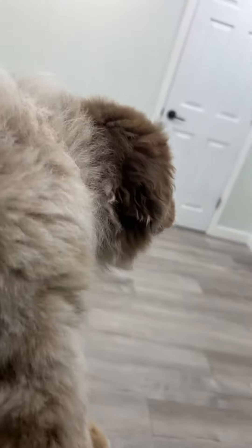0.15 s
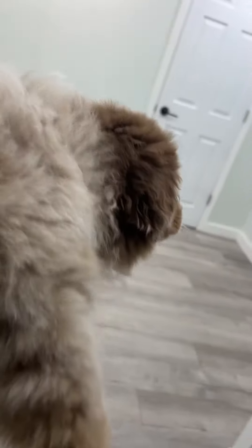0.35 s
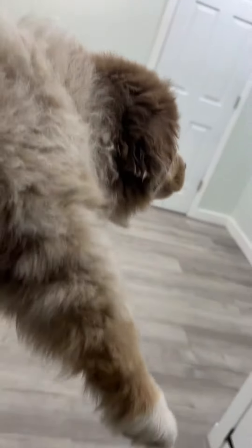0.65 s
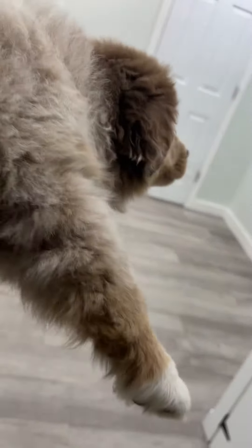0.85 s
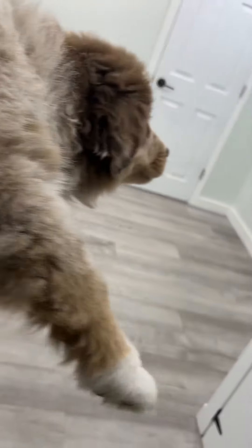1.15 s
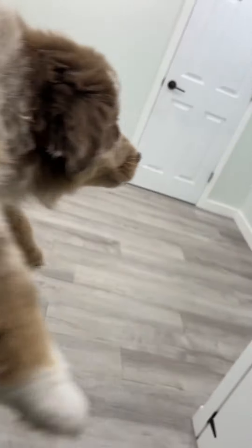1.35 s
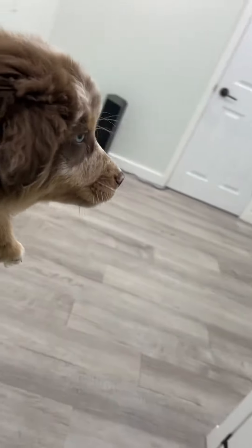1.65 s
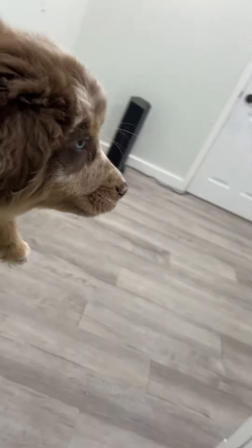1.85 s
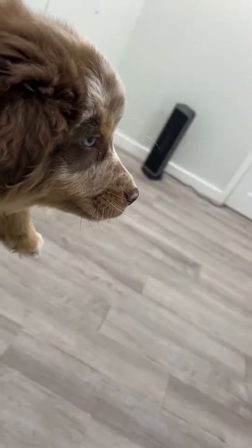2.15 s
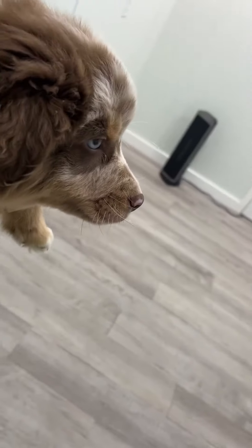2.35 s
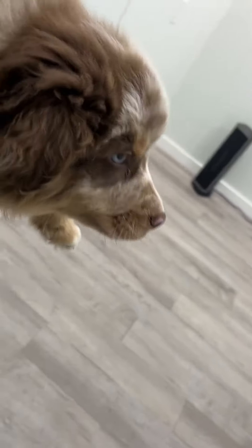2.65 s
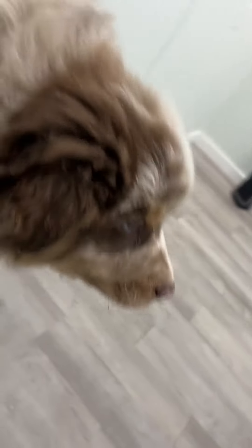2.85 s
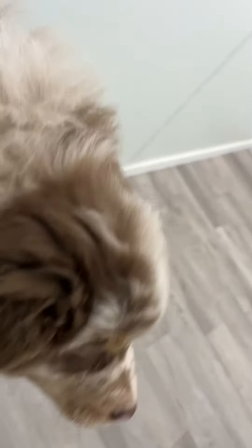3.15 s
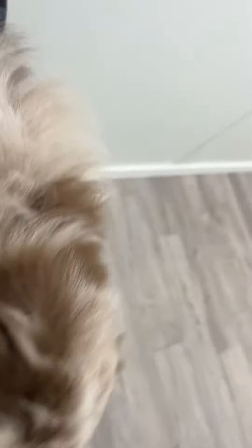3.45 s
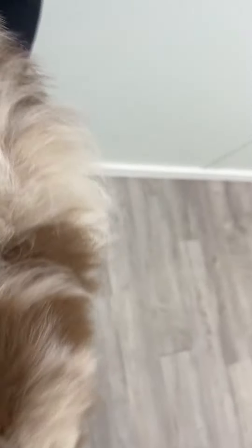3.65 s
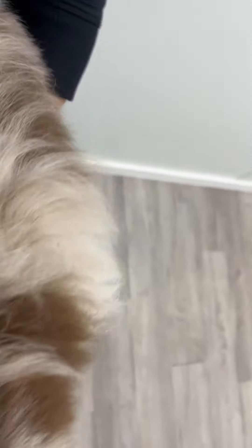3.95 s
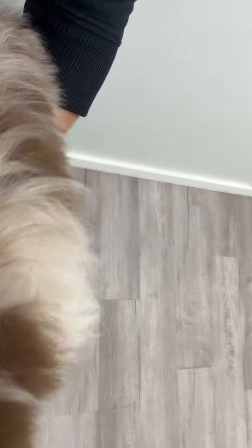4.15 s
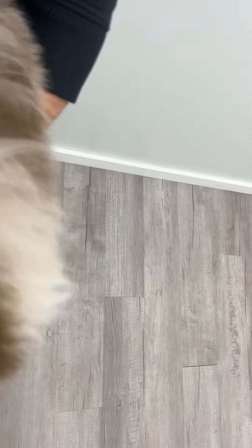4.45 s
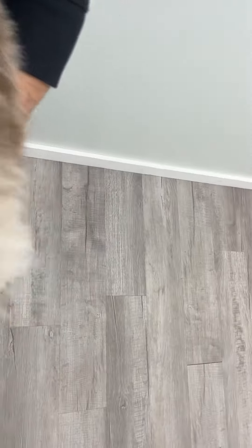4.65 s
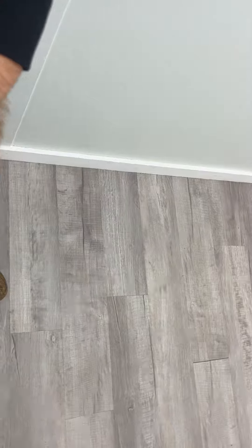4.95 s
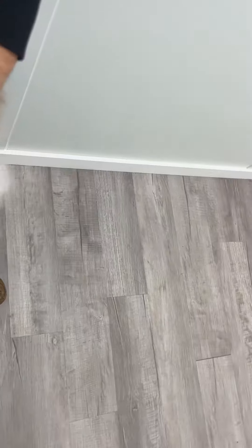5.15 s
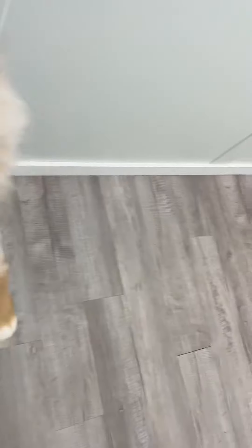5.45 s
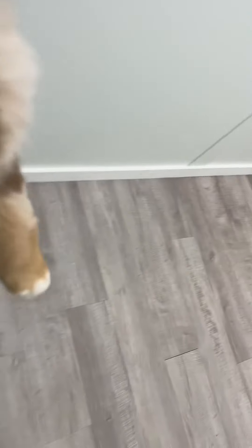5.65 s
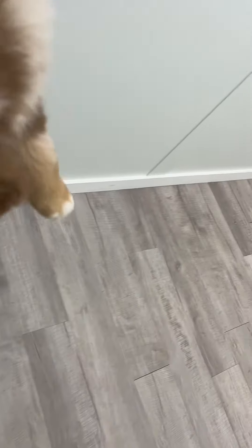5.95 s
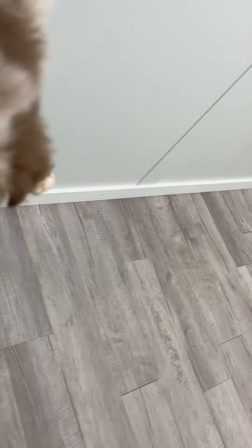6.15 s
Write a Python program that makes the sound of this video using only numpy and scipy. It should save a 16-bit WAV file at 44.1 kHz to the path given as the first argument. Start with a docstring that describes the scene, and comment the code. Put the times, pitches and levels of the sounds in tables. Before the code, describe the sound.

In a bare, reflective room, a low steady hum near 100 Hz lies under still air and faint fur rustle. A very thin, high nasal whistle falls at 0-0.4 s, with a soft booming bump at 0.4. After a tiny peep at 0.7, a puppy close to the microphones, slightly left, gives a short high cry at 1.0 dropping steeply. Another bump comes at 1.25, then whimpers at 1.3 and 1.8, with quick sniffs and a faint click. From 2.3 to 3.8 s a long cry slides from squeal to low, wavering, sometimes rough moan, with a slight bump at 3.2. A quieter gap follows. A rougher, rising-and-falling whine fills 4.3-5.1, a clear strong cry 5.3-5.7. Handling thuds and rustle return from 5.7; a sharp tick at 6.15 lands within a last cry starting at 6.05, and a bump ends it at 6.3.

```python
"""A bare room with a hard floor: a puppy, held up near a phone, whimpers into two close microphones.
Each cry, a near-pure tone with weak overtones and breath, slides from a squeal to a moan that wavers.
Thin nasal whistles, air-jet tones in their own hiss, sound around the cries; echoes smear the slides.
Sine tones make the hum under it; shaped noise makes the still air, the rustle of fur, soft handling
bumps with deep booms, the puppy's sniffs, a faint click and, near the end, a sharp tick."""
import sys
import numpy as np
from scipy import signal
from scipy.fft import rfft, irfft, next_fast_len
from scipy.io import wavfile
from scipy.ndimage import uniform_filter1d

SR = 44100
rng = np.random.default_rng(int(sys.argv[2]) if len(sys.argv) > 2 else 0)


def generate_wav(signal):
    """Clip the signal to [-1, 1] and save it as 16-bit WAV at the path in sys.argv[1]."""
    frames = np.transpose(np.atleast_2d(signal))
    scaled = np.clip(frames, -1, 1) * 32767
    pcm = np.round(scaled).astype(np.int16)
    wavfile.write(sys.argv[1], SR, pcm)


N = 278271
TIME = np.arange(N) / SR  # s
EDGE_HZ = 15900  # top of the phone's band


def gain_of(db):
    """Decibels to amplitude."""
    return 10 ** (np.asarray(db) / 20)


def evened(x):
    """Scales to rms 1."""
    return x / np.sqrt(np.mean(x ** 2) + 1e-20)


def read(points, hz):
    """A spectrum table, joined on a log-frequency axis."""
    f, value = np.transpose(points)
    return np.interp(np.log(hz + 1), np.log(f + 1), value)


def follow(rows):
    """The columns of a curve table at every sample."""
    s, *columns = np.transpose(rows)
    return [np.interp(TIME, s, column) for column in columns]


def eased(x, half, steepness):
    """Moves smoothly from 0 to 1, half-way at the given age or frequency."""
    return 1 - 1 / (1 + (np.maximum(x, 0) / half) ** steepness)


def gate(age, length, rise, fall):
    """Opens softly at age zero and has closed to half amplitude at the given length."""
    opening = np.clip(age / rise, 0, 1) * np.clip((length + fall / 2 - age) / fall, 0, 1)
    return np.sin(np.pi / 2 * opening) ** 2


def swell(s, db, rise, t60):
    """The level of a soft blow: a straight rise, then an even decay."""
    age = np.maximum(TIME - s, 0)
    decay = np.exp(-np.log(1000) * np.maximum(age - rise, 0) / t60)
    return np.minimum(age / rise, 1) * gain_of(db) * decay


def waver(rate_hz):
    """Slow chance of rms 1, fading out above the given rate."""
    count = 8192
    hz = np.fft.rfftfreq(count, N / SR / count)
    slow = irfft(rfft(rng.standard_normal(count)) / (1 + (hz / rate_hz) ** 4))
    return np.interp(TIME, np.linspace(0, N / SR, count), evened(slow))


def shaped(x, gain):
    """Filters by a gain that is a function of frequency."""
    size = next_fast_len(N + 4096)
    return irfft(rfft(x, size) * gain(np.fft.rfftfreq(size, 1 / SR)), size)[..., :N]


def coloured(points):
    """One-channel noise of rms 1 with the colour of a spectrum table."""
    return evened(shaped(rng.standard_normal(N), lambda f: gain_of(read(points, f))))


# Chosen left-right likeness of the scattered sound by band; near 8 kHz it is mono.
# Each row: frequency in Hz, likeness before the bass is drawn together (1 = the same).
LIKENESS = [(400, 0.43), (650, 0.089), (1300, 0.18), (2500, 0.19), (4500, 0.38), (8000, 1), (14000, 0.61)]


def diffuse(a, b, hz):
    """Scattered sound at two microphones: their spacing matters little in the bass, so it is alike there."""
    above_bass = hz ** 2 / (hz ** 2 + 480 ** 2)
    same = 1 - (1 - np.clip(read(LIKENESS, hz), -1, 1)) * above_bass
    mid, side = a * np.sqrt((1 + same) / 2), b * np.sqrt((1 - same) / 2)
    return np.array([mid + side, mid - side])


def noise(gain):
    """Diffuse stereo noise of rms 1 and a given colour."""
    size = next_fast_len(N)
    hz = np.fft.rfftfreq(size, 1 / SR)
    scattered = diffuse(*rfft(rng.standard_normal((2, size))), hz)
    return evened(irfft(scattered * gain(hz), size)[:, :N])


def ports(x, lag):
    """A near sound reaches the left microphone first, the right one a moment (s) later."""
    return np.array([x, shaped(x, lambda f: np.exp(-2j * np.pi * f * lag))])


# Hum of an appliance, lowest tone first. Each row: frequency in Hz, level in dB before HUM_LEVEL.
HUM = [(98.8, -57), (199.3, -77), (298.5, -86.5)]
# The hum changes as the phone moves through the room's standing waves.
# Each row: time in seconds, change of the lowest tone in dB, change of the overtones in dB.
HUM_LEVEL = [(0, -2, 4), (2.4, -0.5, 9), (3.8, -2, 2.5), (4.5, -5, -6.5), (5.8, -5.5, 9.5), (6.3, -23, 14)]
# Colour of the room's still air. Each row: frequency in Hz, relative density in dB per Hz.
AIR = [(15, -62), (32, -45), (55, -5.5), (85, 1), (130, -15), (250, -13), (500, -39.5), (1000, -40.5),
       (2000, -37), (4200, -44), (6500, -62.5), (9000, -65.5), (12000, -79), (15000, -80)]


def background(air_db=-64, wander_s=.00008):
    """Steady hum tones, slightly wandering in time, and the diffuse noise of still air."""
    drift = TIME + wander_s * waver(0.9)
    base, *overtones = [np.sqrt(2) * gain_of(db) * np.sin(2 * np.pi * (hz * drift + rng.random()))
                        for hz, db in HUM]
    base_db, overtones_db = follow(HUM_LEVEL)
    hum = gain_of(base_db) * base + gain_of(overtones_db) * sum(overtones)
    return hum + gain_of(air_db) * noise(lambda f: gain_of(read(AIR, f)))


# Fur and sleeve rubbing near the microphones. Each row: time in seconds, relative level in dB.
RUSTLE = [(0, -64.5), (.2, -71), (.6, -61), (1.2, -62.5), (1.65, -62.5), (1.95, -66), (2.2, -62),
          (2.32, -67), (2.5, -68.5), (2.85, -66), (3.05, -64.5), (3.6, -65), (3.88, -78.5), (4.0, -70.5),
          (4.15, -74), (4.25, -78), (5.15, -73.5), (5.65, -62), (6.31, -61.5)]
# Colour of the rubbing. Each row: frequency in Hz, relative density in dB per Hz.
RUSTLE_COLOUR = [(300, 7), (1000, -2), (2000, -7), (3400, -4.5), (4500, 4), (6300, -18), (8500, -14.5),
                 (10500, -16.5), (12300, -30.5), (14500, -22), (16000, -38.5)]


def rustle(level_db=1, uneven_db=1.5, lag=0.00013, scattered_db=-7):
    """Fur rubs close to the microphones, so most of it arrives by the straight path."""
    close = ports(coloured(RUSTLE_COLOUR), lag)
    scattered = gain_of(scattered_db) * noise(lambda f: gain_of(read(RUSTLE_COLOUR, f)))
    level = follow(RUSTLE)[0] + level_db + uneven_db * waver(17.8)
    return gain_of(level) * (close + scattered)


# Thin nasal whistles, each easing towards its last pitch. Each row: start in seconds, length in seconds,
# attack in seconds, first pitch in Hz, last pitch in Hz, time to half-way in seconds,
# relative level in dB, grip of the voice on it from 0 to 1.
WHISTLES = [ (0.0, 0.38, 0.0014, 8160, 7080, 0.075, -53, 0.1),
            (0.923, 0.19, 0.075, 7850, 7300, 0.066, -70, 0.1),
            (1.308, 0.14, 0.099, 8100, 7500, 0.1, -54.5, 0.5),
            (1.814, 0.12, 0.039, 7970, 7710, 0.11, -60.5, 0.7),
            (2.289, 0.19, 0.044, 7530, 8340, 0.086, -63, 1),
            (4.342, 0.2, 0.0085, 7760, 8060, 0.1, -55.5, 0.46),
            (5.258, 0.16, 0.0047, 7560, 8270, 0.065, -59, 1),
            (5.902, 0.25, 0.029, 7980, 7340, 0.077, -54.5, 1), ]
# A whistle's octave is strong below 14 kHz and fades steeply as its pitch rises.
# Each row: frequency of the octave in Hz, level in dB against the whistle.
WHISTLE_OCTAVE = [(13900, 17), (14330, -2), (14600, -10), (14900, -10), (15300, -19.5), (16200, -49)]


def whistles(swing, jitter=0.0034, voiced_jitter=0.0084, drift=0.0029, flutter_db=3.0, depth=0.88, bend=0.8,
             air_db=-21, air_hz=8900, air_width_hz=1400, low_hz=6600):
    """A thin air-jet tone in its own hiss; the swinging folds unsettle it and give it side bands."""
    out = np.zeros(N)
    voiced = uniform_filter1d(abs(swing), size=400)
    wobble = 1 + (jitter + voiced_jitter * voiced) * waver(100) + drift * waver(24)
    air_band = lambda f: np.exp(-((f - air_hz) / air_width_hz) ** 2)
    air = gain_of(air_db) * evened(shaped(rng.standard_normal(N), air_band))
    for start, length, attack, first_hz, last_hz, half, db, grip in WHISTLES:
        opening = gate(TIME - start, length, attack, fall=0.051)
        on = opening > 0
        hz = first_hz + (last_hz - first_hz) * eased(TIME[on] - start, half, steepness=2)
        phase = 2 * np.pi * np.cumsum(hz * wobble[on]) / SR + bend * grip * swing[on]
        octave = gain_of(read(WHISTLE_OCTAVE, 2 * hz)) * np.sin(2 * phase)
        jet = np.sin(phase) + air[on] + octave
        out[on] += gain_of(db) * opening[on] * jet * (1 + depth * grip * swing[on])
    return shaped(out * gain_of(flutter_db * waver(60)), lambda f: eased(f, low_hz, steepness=53))


# Soft bumps of handling and paws. Each row: start in seconds, level in dB before the scuffing,
# rise in seconds, t60 in seconds, low edge in Hz, top edge in Hz.
BUMPS = [(0.387, -44.5, 0.065, 0.74, 113, 250), (0.79, -54.5, 0.03, 0.39, 120, 292),
         (1.248, -42.5, 0.019, 0.94, 119, 175), (3.16, -51, 0.0037, 0.13, 180, 353),
         (5.681, -58.5, 0.048, 0.95, 80, 130), (5.939, -46.5, 0.012, 0.3, 197, 460),
         (6.284, -37.5, 0.022, 1, 418, 484)]
# Deep booms close to some of the bumps. Each row: start in seconds, level in dB, t60 in seconds.
BOOMS = [(0.391, -49, 1.3), (1.24, -47, 3), (5.72, -61, 0.59)]


def bumps(boom_hz=52, boom_octaves=0.31, boom_rise=0.14, rumble_db=-73,
          ring_hz=172, ring_width_hz=22, ring_db=8, grain_db=-1.0):
    """Dull, scuffing thuds that stir one low resonance, with deep booms over a constant faint rumble."""
    boom = gain_of(rumble_db) + sum(swell(s, db, boom_rise, t60) for s, db, t60 in BOOMS)
    out = boom * noise(lambda f: np.exp(-(np.log2((f + 1) / boom_hz) / boom_octaves) ** 2 / 2))
    scuff = gain_of(grain_db * waver(24))
    for s, db, rise, t60, low_hz, top_hz in BUMPS:
        def thud_gain(f):
            ring = gain_of(ring_db / (1 + ((f - ring_hz) / ring_width_hz) ** 2))
            return ring * f ** 2 / (low_hz ** 2 + f ** 2) / (1 + (f / top_hz) ** 3.17)
        out += noise(thud_gain) * scuff * swell(s, db, rise, t60)
    return out


# Colour of the overtones through the nose, and with the mouth open; also of the breath.
# Each row: frequency in Hz, relative level in dB.
THROAT = [(900, 27), (1450, 8.5), (1750, 14), (2250, 10), (3000, 10), (3800, 4.5), (4600, 5), (5400, -3),
          (6400, -15.5), (8500, -13), (10000, -23), (12000, -46)]
USUAL_HZ = 650  # pitch at which the mouth's resonances stand where listed


def throat_db(f, pitch_hz, mouth, lower_hz, lower_db, upper_hz, upper_db,
              rise=0.2, width_hz=190, brighten_db=8.5):
    """Overtones tilt up (dB per octave) and two mouth resonances rise (octaves) per octave of pitch."""
    strain = np.log2(pitch_hz / USUAL_HZ)  # octaves
    peak = lambda hz: 1 / (1 + ((f - hz * 2 ** (rise * strain)) / width_hz) ** 2)
    tilt = brighten_db * strain * np.log2(f / lower_hz)
    return read(THROAT, f) + tilt + mouth * (lower_db * peak(lower_hz) + upper_db * peak(upper_hz))


def hiss(swing, low_hz=900):
    """Air escapes in a puff each time the folds part."""
    puffs = rng.standard_normal(N) * (1 + swing)
    return evened(shaped(puffs, lambda f: gain_of(read(THROAT, f)) * f ** 2 / (f ** 2 + low_hz ** 2)))


def nose(x, ring_hz=1458, ring_width_hz=55, ring_db=5, dip_hz=1850, dip_width_hz=190, dip_db=-4.0, low_hz=335):
    """The nasal passage rings in one band and swallows the next; so small a head gives off little bass."""
    def passage(f):
        ring = ring_db / (1 + ((f - ring_hz) / ring_width_hz) ** 2)
        dip = dip_db * np.exp(-((f - dip_hz) / dip_width_hz) ** 2)
        return gain_of(ring + dip) * eased(f, low_hz, steepness=10.5)
    return shaped(x, passage)


def gesture(cry, moan, sliding_rough=0.5, slide_octaves_per_s=10):
    """One cry's controls: the squeal slides into the moan as the mouth opens; fast slides set the roughness."""
    start, length, attack, first_hz, top_hz, climb, slide, steepness, *squeal = cry[:-4]
    opening = gate(TIME - start, length, attack, fall=0.067)
    on = opening > 0
    age = TIME[on] - start
    settled = eased(age - climb, slide, steepness)
    squeal_hz = first_hz + (top_hz - first_hz) * np.sin(np.pi / 2 * np.minimum(age / climb, 1))
    controls = []
    for high, low in zip([squeal_hz, *squeal], follow(moan)):
        controls.append((1 - settled) * high + settled * uniform_filter1d(low[on], size=500))
    hz, tone_db, octave_db, upper_db, held = controls
    sliding = np.tanh(abs(np.gradient(np.log2(hz))) * SR / slide_octaves_per_s)
    rough = uniform_filter1d(held + (sliding_rough - held) * sliding, size=1000)
    return on, opening[on], hz, tone_db, octave_db, upper_db, np.clip(rough, 0, 1), settled


# Each cry opens with a squeal that moves to a second pitch, then slides to a moan. Each row: start in seconds,
# length in seconds, attack in seconds, first pitch in Hz, second pitch in Hz, time between them in seconds,
# time to half-way down in seconds, steepness of the slide; the squeal's relative levels in dB of fundamental,
# octave and higher overtones, its roughness from 0 to 1; then the lower mouth resonance at the usual pitch
# in Hz, its height in dB, the upper one in Hz, its height in dB.
CRIES = [ (0.694, 0.0067, 0.0052, 896, 974, 0.017, 0.03, 2.2, -33.5, -70, -52, 0.3, 3200, 0, 4470, 0),
         (0.966, 0.16, 0.016, 1559, 1528, 0.021, 0.086, 3.08, -35, -54.5, -62.5, 0.05, 3000, -22, 4000, 7),
         (1.314, 0.39, 0.013, 1372, 1482, .03, 0.064, 2.7, -40.5, -55.5, -57, 0.15, 3400, 14, 5370, 13),
         (1.833, 0.35, 0.014, 1145, 1115, 0.013, 0.038, 3.25, -45, -58, -64.5, 0, 3430, 8, 4630, 7.5),
         (2.314, 1.485, 0.012, 1055, 1291, .045, 0.043, 3.37, -35.5, -48.5, -56, 0.2, 3460, 5.5, 4680, 5.5),
         (4.342, 0.74, 0.022, 834.4, 1031, .115, .058, 3.2, -42.5, -67.5, -65, .8, 3250, 12.5, 4130, 2),
         (5.273, 0.4, 0.052, 1167, 1193, 0.032, 0.052, 3.2, -32, -47.5, -54, 0.22, 3280, 14, 4410, 11.5),
         (6.058, 0.25, 0.01, 1187, 1175, 0.003, 0.04, 2.47, -43.5, -56, -65, 0.35, 3460, 9.5, 4160, 1), ]
# The moan each cry settles into, one list per cry in the same order. Each row: time in seconds, pitch in Hz,
# relative levels in dB of fundamental, octave and higher overtones, roughness from 0 to 1.
MOANS = [
    [(.72, 910, 2, -75, -76, 0.4)],
    [(1.07, 475, -29, -56, -53, 0.5), (1.11, 417, -43, -42, -54, .7)],
    [(1.46, 613.6, -37, -51.5, -49, 0.1), (1.51, 610.4, -37, -72, -44, 0.5),
     (1.55, 542, -45, -51.5, -53, 0.3), (1.62, 526, -51.5, -40.5, -59, 0.1),
     (1.68, 524.4, -43, -56.5, -61.5, 0.18)],
    [(1.92, 656.4, -31, -56, -45.5, 0), (1.955, 669.5, -29.5, -61, -49.5, 0),
     (2, 746.6, -36.5, -56, -51.5, 0.2), (2.035, 773, -32, -45, -48.5, 0.3),
     (2.075, 548, -36, -50.5, -48, 0.4), (2.125, 487.7, -35.5, -51, -58.5, 0.54),
     (2.21, 500.4, -40.5, -49, -75, 0.2)],
    [(2.45, 573.9, -39, -62, -52.5, 0.28), (2.51, 512, -36, -43.5, -56.5, 0.4),
     (2.58, 541.4, -34.5, -42.5, -53.5, 0.16), (2.66, 593.7, -37.5, -51.5, -57.5, 0.1),
     (2.7, 586, -43, -55.5, -52, 0.1), (2.755, 431.4, -27, -48.5, -66, 0.5),
     (2.8, 368.6, -33.5, -46.5, -66, 0.6), (2.835, 424.7, -33.5, -50.5, -58.5, 0.6),
     (2.9, 437.6, -28.5, -51.5, -61, 0.34), (2.96, 472.3, -34, -53.5, -64, 0.15),
     (3.01, 499.7, -33, -47.5, -58.5, 0.1), (3.045, 487.8, -31, -56, -70, 0.1),
     (3.08, 388.6, -34, -42.5, -69.5, 0.2), (3.125, 387, -30.5, -51.5, -65, 0.4),
     (3.18, 430.9, -35.5, -58.5, -68, 0.5), (3.265, 469.2, -39.5, -52.5, -64.5, 0.3),
     (3.305, 617.6, -29.5, -62, -61.5, 0.2), (3.34, 609.4, -39, -46, -60.5, 0.15),
     (3.385, 586.7, -39.5, -51, -64.5, 0), (3.415, 464.5, -33, -49.5, -63.5, 0),
     (3.535, 461.8, -35.5, -50.5, -64, 0), (3.565, 514.7, -33.5, -54, -64.5, 0),
     (3.6, 485.7, -33, -56.5, -64, 0.3), (3.69, 467.5, -32, -49, -62, 0.2),
     (3.72, 545.2, -40, -55.5, -66.5, 0.3), (3.76, 553.3, -41.5, -62.5, -65.5, 0.4),
     (3.8, 517.5, -44, -59.5, -61, 0.5)],
    [(4.59, 617.7, -39.5, -53, -54.5, .25), (4.69, 576.7, -37.5, -50.5, -62.5, 0.12),
     (4.78, 589.7, -34.5, -55, -52, 0.05), (4.82, 680.8, -37, -63, -50.5, .05),
     (4.855, 727.7, -33, -47, -53, 0.05), (4.91, 730.3, -29, -38, -46.5, 0.05),
     (4.957, 717, -39.5, -50.5, -45.5, 0.15), (4.995, 505, -28, -44.5, -54.5, 0.5),
     (5.03, 360.7, -40, -60, -57, 0.9), (5.06, 471, -46, -61, -57, 0.7), (5.085, 482, -41.5, -59, -69, 0.8)],
    [(5.44, 666.3, -42, -58, -55.5, 0.1), (5.5, 640, -37.5, -54, -47, 0),
     (5.55, 633.6, -37.5, -45.5, -44.5, 0), (5.6, 628.2, -44, -53, -51.5, 0),
     (5.64, 653.6, -36, -54, -54, 0.14), (5.7, 666, -36, -54, -61, 0.4)],
    [(6.16, 702, -39.5, -56.5, -52, 0.1), (6.23, 665.4, -35.5, -61, -51, .1),
     (6.3, 661, -34.5, -58, -50, 0.2)],
]


def cries(jitter=0.027, rasp=0.024, shimmer_db=5.5, fundamental_db=-2, octave_db=-2, upper_db=-2,
          air_share=0.42, airy_above_hz=1150, unrest=0.11, quaver_share=0.008, patchy_db=4.5, stray_rad=0.7):
    """Vocal folds: a quavering tone whose weak overtones turn to hiss as it roughens or climbs; and their swing."""
    voice, swing, leak = np.zeros((3, N))
    wobble = jitter * waver(44) + rasp * waver(198)
    flutter_db, quaver = shimmer_db * waver(44), quaver_share * waver(24)
    order = np.arange(3, 21)[:, None]
    # the folds close unevenly, so each overtone comes and goes and strays on its own
    patches = gain_of(patchy_db * np.array([waver(20.0) for _ in order]))
    stray = stray_rad * np.array([waver(45.0) for _ in order])
    for cry, moan in zip(CRIES, MOANS):
        on, opening, hz, first, second, upper, rough, settled = gesture(cry, moan)
        unsteady = rough + unrest
        airy = 1 - (1 - np.clip(air_share * rough, 0, 1)) * (1 - eased(hz, airy_above_hz, steepness=5.3))
        # slack folds on the low notes quaver most
        shaken_hz = hz * (1 + unsteady * wobble[on] + quaver[on] * (USUAL_HZ / hz) ** 2)
        phase = 2 * np.pi * np.cumsum(shaken_hz) / SR
        overtone_hz = order * hz
        weights = gain_of(throat_db(overtone_hz, hz, settled, *cry[-4:]))
        weights *= (overtone_hz < EDGE_HZ) * patches[:, on]
        # the overtones above about 2 kHz set the common level
        weights /= np.sqrt((weights ** 2 / (1 + (2000 / overtone_hz) ** 10)).sum(0) + 1e-9)
        overtones = (weights * np.sin(order * phase + stray[:, on])).sum(0)
        tone = gain_of(first + fundamental_db) * np.sin(phase)
        tone += gain_of(second + octave_db) * np.sin(2 * phase)
        tone += gain_of(upper + upper_db) * np.sqrt(1 - airy) * overtones
        voice[on] += np.sqrt(2) * tone * opening * gain_of(unsteady * flutter_db[on])
        swing[on] += opening * np.cos(phase)
        leak[on] += opening * gain_of(upper) * np.sqrt(airy)
    return nose(voice + leak * hiss(swing)), swing


# The puppy's quick sniffs. Each row: start in seconds, length in seconds, relative level in dB.
SNIFFS = [(1.267, 0.22, -62.5), (1.656, 0.096, -63.5), (2.17, 0.057, -62.5), (2.337, 0.11, -71),
          (6.176, 0.04, -56.5)]
# Colour of the sniffs. Each row: frequency in Hz, relative density in dB per Hz.
SNIFF_COLOUR = [(1000, -23), (4500, -1), (6400, -15), (8300, -12), (10500, -10.5), (12300, -36),
                (14200, -4), (15800, -26)]


def sniffs(rise=0.015, fall=.05):
    """Short, faint rushes of air through the nose: gated noise."""
    level = sum(gain_of(db) * gate(TIME - s, length, rise, fall) for s, length, db in SNIFFS)
    return level * coloured(SNIFF_COLOUR)


# A faint click, then a sharp tick, as of a claw. Each row: start in seconds, relative level in dB.
TICKS = [(1.912, -43.5), (6.1446, -26.5)]
# Colour of both. Each row: frequency in Hz, relative density in dB per Hz.
TICK_COLOUR = [(500, -17), (2800, -20), (4200, 19), (5200, -4), (6300, 2), (7600, -25), (9500, -5),
               (12000, -14), (15000, -17)]


def ticks(decay=0.0014):
    """Very short bright snaps: noise that starts at once and dies in milliseconds."""
    bursts = sum(gain_of(db) * (TIME >= s) * np.exp(-abs(TIME - s) / decay) for s, db in TICKS)
    return bursts * coloured(TICK_COLOUR)


def turned_away(x, corner_hz=1100, shadow_db=-4):
    """The puppy faces the room, so its head shades the overtones on the straight path."""
    return shaped(x, lambda f: gain_of(shadow_db * f ** 4 / (f ** 4 + corner_hz ** 4)))


# How long the bare room rings. Each row: frequency in Hz, t60 in seconds.
ROOM = [(300, 0.45), (650, 0.42), (1400, 0.61), (3000, 0.46), (8000, 0.8), (14500, 0.19)]
# First returns from floor and near walls. Each row: delay at the left microphone in seconds,
# delay at the right in seconds, level in dB against the late room.
ECHOES = [(.0043, 0.0061, -33.5), (.0092, 0.0082, -9), (.0147, 0.016, -9.5), (.0213, .021, -4),
          (.031, .0313, -6.5)]


def room(x, first=0.0012, build=0.009):
    """A few distinct echoes, and dense reflections off bare walls, each band dying at its own speed."""
    hz, t, z = signal.stft(rng.standard_normal((2, SR)), SR, nperseg=512)
    z = diffuse(*z, hz[:, None]) * np.exp(-np.log(1000) * t / read(ROOM, hz)[:, None])
    tail = signal.istft(z, SR, nperseg=512)[1][:, :SR]
    tail *= np.clip((TIME[:SR] - first) / build, 0, 1)
    tail /= np.linalg.norm(tail[0])
    # a sliding cry beats against these echoes and throbs
    for left, right, db in ECHOES:
        tail += gain_of(db) * np.sinc((TIME[:SR] - np.array([[left], [right]])) * SR)
    return signal.fftconvolve(x[None], tail / np.linalg.norm(tail[0]), axes=1)[:, :N]


# Loudness of the puppy, left minus right. Each row: time in seconds, difference in dB before LEAN.
PAN = [(0, 2.5), (1.1, 2.5), (1.6, 2.5), (2.2, 2), (2.8, 2), (3.4, 3), (4.6, 2.5), (5.3, 3), (5.7, 4.5),
       (6.3, 2)]
# Further difference by band, left minus right. Each row: frequency in Hz, difference in dB.
LEAN = [(300, 0.5), (450, -3.5), (700, -1.6), (1200, 4.5), (2200, -2.5), (4000, -4.5), (8000, -2.5)]


def scene(lag=0.00012, room_lag=0.0001, direct_db=-1, whistle_room_db=-4, tick_room_db=-5):
    """The puppy's sound reaches the left microphone first, then returns from the walls."""
    voice, swing = cries()
    whistle, tick = whistles(swing), ticks()
    direct = ports(turned_away(voice) + whistle + tick + sniffs(), lag)
    # the thin whistles and the short snaps stir the room less
    left, right = room(voice + gain_of(whistle_room_db) * whistle + gain_of(tick_room_db) * tick)
    walls = np.array([left, ports(right, room_lag)[1]])
    sides = np.array([[.5], [-.5]])
    puppy = shaped(gain_of(direct_db) * direct + walls, lambda f: gain_of(sides * read(LEAN, f)))
    return gain_of(sides * follow(PAN)[0]) * puppy + bumps() + rustle() + background()


def record(dry):
    """The phone's band limit: a steep low-pass."""
    low_pass = signal.firwin(511, EDGE_HZ, window=("kaiser", 9), fs=SR)
    return signal.oaconvolve(dry, low_pass[None], "same")


dry = scene()
out = record(dry)
generate_wav(out)
```